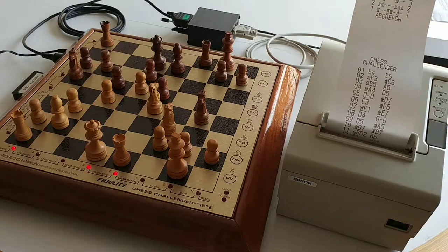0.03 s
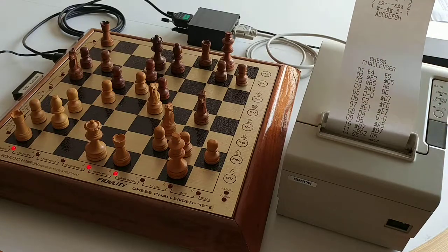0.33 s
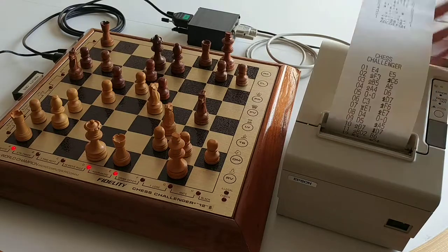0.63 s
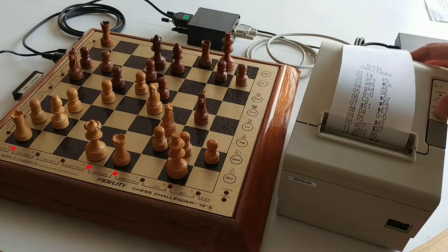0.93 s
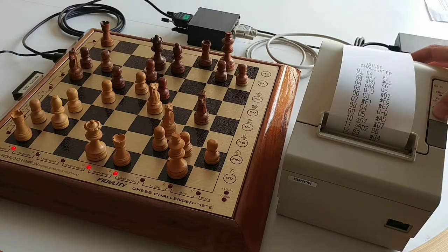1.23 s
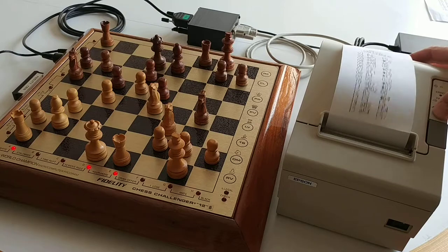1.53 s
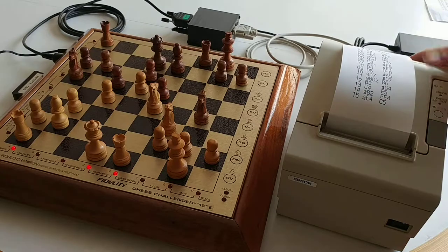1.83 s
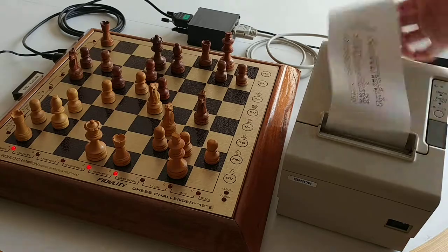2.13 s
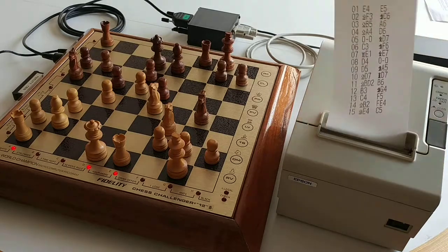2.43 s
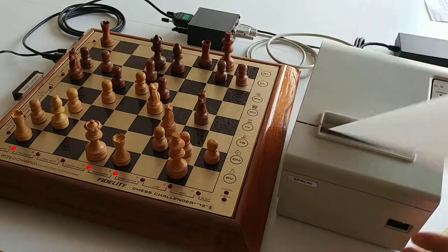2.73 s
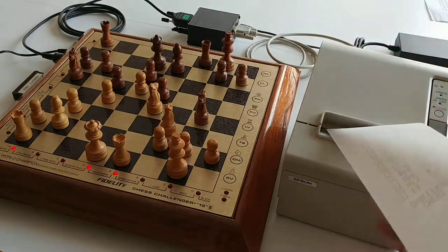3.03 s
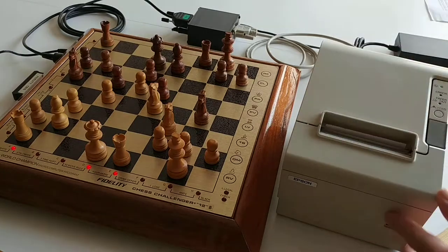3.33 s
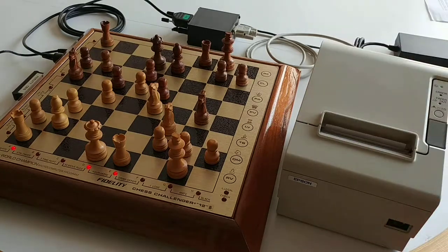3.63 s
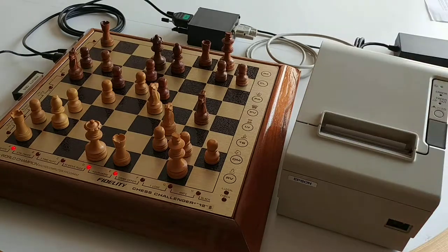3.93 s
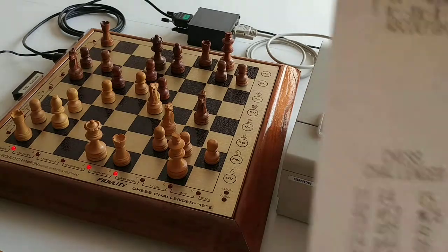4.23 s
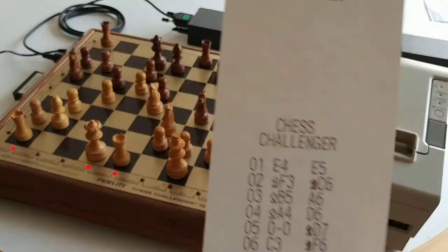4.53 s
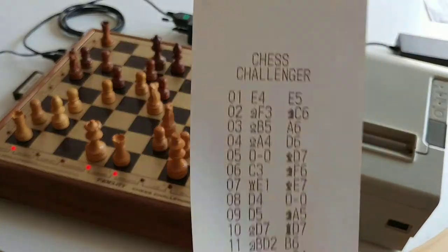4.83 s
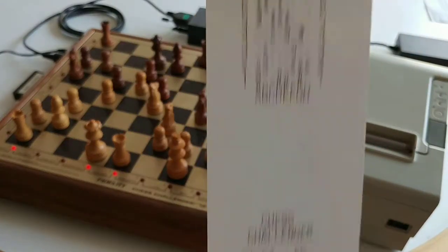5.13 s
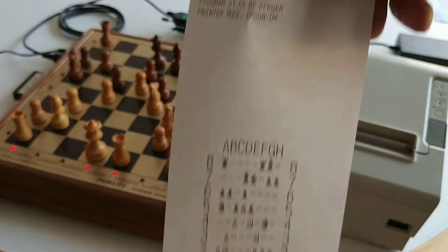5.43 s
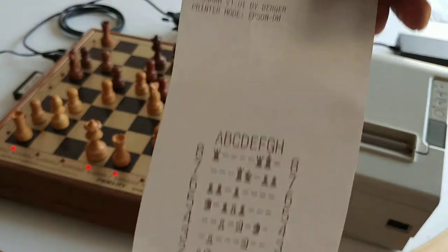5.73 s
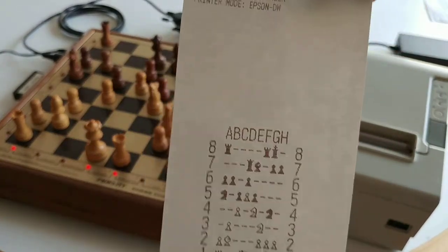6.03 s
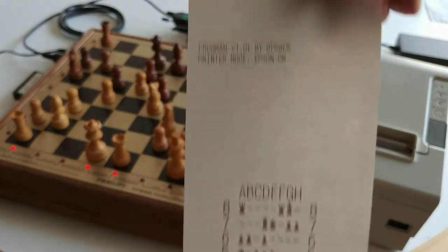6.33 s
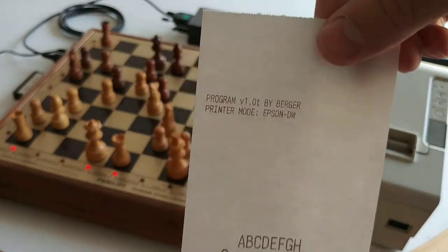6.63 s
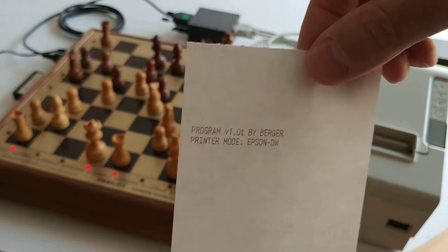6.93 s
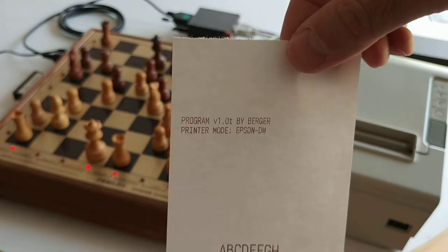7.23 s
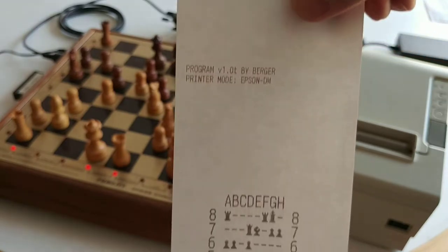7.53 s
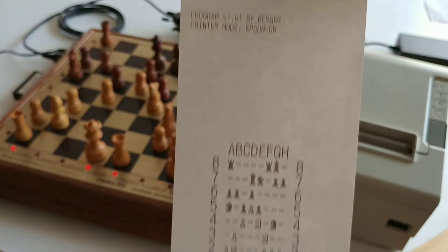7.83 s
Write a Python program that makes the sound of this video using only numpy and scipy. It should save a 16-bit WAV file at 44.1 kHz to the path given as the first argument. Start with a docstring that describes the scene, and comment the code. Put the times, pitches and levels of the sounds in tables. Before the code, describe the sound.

A small, quiet room with a faint low background murmur. After a slight paper rustle, a receipt printer a little to the right clicks at about 1 second and gives a tiny motor nudge. From 1.4 to 1.7 seconds it feeds paper with a short whine over rasping gears, its case shuddering and ringing faintly. From 2 seconds the paper hisses softly as it is pulled taut, then nicks with a sharp snap at 2.7. At about 3.2 seconds comes one short, loud rip, followed by a dull flap and light rustling. From 4.2 to 5.5 seconds the strip swings up close to the microphone, with crisp snaps, sliding hiss and soft, low puffs of air. Lighter crinkles and pops follow, close and centred, until about 6.5 seconds, then only faint paper rustles remain, fading toward 8 seconds.

```python
"""A small receipt printer clicks, nudges its paper, then feeds it: the stepper motor clatters up into
a whine, gears rasp, the frame rings and the case shudders. A hand pulls the strip taut and rips it off
along the toothed bar, fibres breaking in spurts. Swung up close to the microphones, the strip slides
with a hiss, buckles, snaps and pushes soft puffs of air. The room is small and quiet."""
import sys
import numpy as np
from scipy import signal
from scipy.fft import rfft, irfft, next_fast_len
from scipy.io import wavfile
from scipy.ndimage import map_coordinates

SR = 44100
rng = np.random.default_rng(int(sys.argv[2]) if len(sys.argv) > 2 else 0)


def dump_mix(stems):
    """Bounce the given channels to the path in sys.argv[1] as a 16-bit WAV at rate SR."""
    frames = np.atleast_2d(stems).T  # one column per channel
    limited = np.clip(frames, -1, 1)  # hard clip at full scale
    pcm = np.round(limited * 32767).astype(np.int16)
    wavfile.write(sys.argv[1], SR, pcm)


N = 357210
T = np.arange(N) / SR
SIDE = np.array([[1], [-1]])  # adds on the left, subtracts on the right


def amp(db):
    """Decibels to gain."""
    return 10 ** (np.asarray(db) / 20)


def unit(x):
    """Scale to rms 1."""
    return x / np.sqrt(np.mean(x ** 2) + 1e-20)


def along(points, hz):
    """Read a curve of (freq_hz, value) points on a log frequency axis."""
    freqs, values = np.transpose(points)
    return np.interp(np.log(hz + 1), np.log(freqs + 1), values)


def wobble(rate):
    """A smooth random curve, rate knots a second."""
    return map_coordinates(rng.standard_normal(int(N * rate / SR) + 4), [T * rate])


def swell_db(start, end, rise, t60, t=T):
    """Envelope in dB: attack (20 dB in rise seconds), hold from start to end, release."""
    return 20 * np.minimum(t - start, 0) / rise - 60 * np.maximum(t - end, 0) / t60


def colour(x, points, tilt_db=0):
    """Minimum-phase EQ through (freq_hz, gain_db) points, tilted per octave; white noise keeps its power."""
    n = x.shape[-1]
    m = 2 * next_fast_len(n // 2 + 4096)
    hz = np.fft.rfftfreq(m, 1 / SR)
    gain = unit(amp(along(points, hz) + tilt_db * np.log2(hz + 20)))
    cepstrum = irfft(np.log(gain + 1e-6))
    cepstrum[1:m // 2] *= 2
    cepstrum[m // 2 + 1:] = 0
    return irfft(rfft(x, m) * np.exp(rfft(cepstrum)), m)[..., :n]


def noise(points):
    """Coloured noise of rms about 1."""
    return colour(rng.standard_normal(N), points)


def crackle(rate, spread_db, size=N):
    """Tiny impulses of uneven strength at random times, rms 1."""
    strength = amp(spread_db * np.clip(rng.standard_normal(size), -2, 2)) * rng.standard_normal(size)
    return unit(strength * (rng.random(size) < rate / SR))


def add(track, start_s, sound):
    """Mix a sound into the track at start_s."""
    part = track[max(round(start_s * SR), 0):][:len(sound)]
    part += sound[:len(part)]


def broad(source, apart_hz):
    """A wide sheet: above apart_hz each microphone hears a different part of it."""
    mid, side = rfft(np.array([source(), source()]))
    hz = np.fft.rfftfreq(N, 1 / SR)
    width = np.pi / 4 * hz ** 2 / (hz ** 2 + apart_hz ** 2)
    return irfft(np.cos(width) * mid + SIDE * np.sin(width) * side, N)


# The small room's reverb time: freq_hz, t60_s
ROOM_DECAY = [(100, .7), (350, .55), (800, .42), (2000, .35), (8000, .32), (15000, .28)]


def place(x, lag_ms, wet_db):
    """Direct sound, reaching the left microphone lag_ms after the right, plus the room's reverb."""
    m = next_fast_len(N + SR)
    hz = np.fft.rfftfreq(m, 1 / SR)
    direct = np.exp(-1j * np.pi * hz * lag_ms / 1000 * SIDE)
    bands_hz, t, wash = signal.stft(rng.standard_normal((2, SR * 3 // 4)), SR, nperseg=256)
    decay = amp(-60 * t / along(ROOM_DECAY, bands_hz)[:, None]) * (t > .003)
    tail = signal.istft(wash * decay, SR, nperseg=256)[1]
    mid, side = rfft(tail / np.linalg.norm(tail[0]), m)
    width = np.pi / 4 * hz / (hz + 900)  # long waves reach both microphones alike
    reverb = np.cos(width) * mid + SIDE * np.sin(width) * side
    return irfft(rfft(x, m) * (direct + amp(wet_db) * reverb), m)[:, :N]


# Colour of the left and right microphone ports: freq_hz, gain_db
LEFT_PORT_EQ = [(200, 4.5), (380, 3.5), (700, 5), (2400, 4.5), (4500, 5), (7000, 2), (8100, 0.5),
                (8800, -3.5), (10400, 6.5), (12500, -1), (15500, -2)]
RIGHT_PORT_EQ = [(200, 6.5), (380, 8.5), (700, 3), (2400, 7), (4500, 7.5), (6000, 8.5), (7300, 13.5),
                 (8200, 6.5), (9000, -14), (10200, -1.5), (12500, -3), (15500, -14.5)]


def mic_ports(x):
    """Each microphone port has its own resonances."""
    return np.array([colour(x[0], LEFT_PORT_EQ), colour(x[1], RIGHT_PORT_EQ)])


# Colour of the still room: freq_hz, gain_db
ROOM_TONE_EQ = [(22, -24.5), (38, -6), (54, 0), (100, -4), (150, -12.5), (270, -9.5), (400, -17),
                (580, -9.5), (1000, -21), (1700, -28), (5000, -34), (8800, -37), (10400, -29.5),
                (15000, -43.5)]


def room_tone(floor_db=-69.5, side_db=-8):
    """A bed of low murmur and faint hiss."""
    return amp(floor_db) * (noise(ROOM_TONE_EQ) + amp(side_db) * SIDE * noise(ROOM_TONE_EQ))


SWING_START_S, SWING_END_S, SWING_RISE_S = 4.12, 4.36, 1.0  # the strip is swung up to the microphones
# Low rumble of air pushed by the strip: freq_hz, gain_db
AIR_EQ = [(15, -37), (30, -12), (48, 9.5), (110, -11), (250, -9), (1000, -68.5)]


def waft(swing_db=-58, puff_db=-16, side_db=-7):
    """The swing and each flap after it push a little air at the microphones, not quite alike at both."""
    swing = swing_db + swell_db(SWING_START_S, SWING_END_S, SWING_RISE_S, t60=0.77)
    puffs = [db + puff_db + swell_db(peak_s, peak_s, rise=0.023, t60=0.19)
             for peak_s, db, _, _ in DULL_BURSTS if peak_s > SWING_END_S]
    air = noise(AIR_EQ) + amp(side_db) * SIDE * noise(AIR_EQ)
    return amp(np.max([swing] + puffs, axis=0)) * air


# Body of the loose sheet, shared by bends, bursts and pops: freq_hz, gain_db
SHEET_EQ = [(25, -25.5), (50, -10.5), (150, -7), (350, -8), (600, 5), (900, -0.5), (1400, -5.5), (2500, -9),
            (5000, -15.5), (8000, -15), (15000, -32.5)]


def bend(level_db=-68, fidget_db=3, settle_db_per_s=10):
    """Held up, the strip murmurs as it bends and slowly calms down."""
    held_db = swell_db(SWING_START_S, SWING_END_S, SWING_RISE_S, t60=60 / settle_db_per_s)
    return amp(held_db + level_db + fidget_db * wobble(10)) * colour(crackle(4000, 2), SHEET_EQ)


# Colour of the paper hiss: freq_hz, gain_db
HISS_EQ = [(200, -7), (700, -1), (1500, -9), (3500, -6), (7000, 0.5), (11000, -3.5), (15000, -13)]
# Swells of hiss: start_s, end_s, level_db, ramp_db, rise_s
HISS_SWELLS = [(0.557, 0.637, -73, 8, 0.12), (0.903, 0.946, -61, -5, 0.026),
               (2.054, 2.265, -57.5, -4, 0.095), (2.37, 2.612, -49, 9, 0.21),
               (2.705, 2.74, -45.5, -20, 0.016), (2.992, 3.016, -54.5, 0.5, 0.077),
               (3.11, 3.133, -54.5, 20, .04), (3.607, 3.686, -53.5, 5.5, 0.14),
               (3.93, 3.96, -65, -1.5, .015), (4.121, 4.24, -56.5, -5, 0.079),
               (4.253, 4.35, -45.5, -5, 0.031), (4.408, 4.493, -43, 8.5, .05),
               (4.575, 4.64, -44, -0.5, .08), (4.856, 4.9, -54, 2, 0.23), (5.103, 5.151, -37.5, 2.5, 0.13),
               (5.333, 5.382, -45.5, 2, 0.04), (5.736, 5.879, -51, 5.5, 0.014), (5.96, 6.15, -56, 2, 0.059),
               (6.492, 6.629, -62.5, -6, .015), (6.761, 6.83, -69, 0, 0.073),
               (7.453, 7.508, -66.5, -1, .08), (7.859, 8.089, -63, -4, .06)]


def paper_hiss(trim_db=-3, crinkle_db=-8, uneven_db=1.96, t60_s=0.39):
    """Fine hiss with stray crinkles: paper sliding, and the fading wash after a loud snap."""
    t = np.arange(0, N / SR, .002)
    swells = []
    for start, end, db, ramp_db, rise in HISS_SWELLS:
        ramp = np.clip((t - start) / (end - start) - .5, -.5, .5)
        swells.append(db + ramp_db * ramp + swell_db(start, end, rise, t60_s, t))
    envelope_db = np.interp(T, t, np.max(swells, axis=0))
    grains = crackle(20000, 2) + amp(crinkle_db) * crackle(300, 3)
    return amp(envelope_db + trim_db + uneven_db * wobble(40)) * colour(grains, HISS_EQ)


# Short dull bursts: peak_s, level_db, rise_s, tilt_db_per_octave
DULL_BURSTS = [(.954, -52.5, 0.1, -0.5), (1.052, -41.5, 0.0027, 0), (2.188, -50, 0.005, 3),
               (2.211, -42.5, 0.027, 3), (2.69, -25.5, 0.015, 3), (2.866, -47, 0.0058, -2),
               (3.33, -32, 0.025, -2), (3.42, -45.5, .007, -0.5), (3.835, -51.5, .04, -2.5),
               (3.984, -51.5, .005, -3.5), (4.115, -47.5, 0.034, -4.5), (4.32, -45, 0.067, -2.5),
               (4.385, -33, 0.012, 0), (4.458, -39.5, 0.048, -1), (4.611, -43.5, .014, -3),
               (4.988, -52.5, .011, 0.5), (5.089, -38.5, 0.018, 3.5), (5.16, -37, 0.066, 0.5),
               (5.226, -43.5, .02, 0.5), (5.438, -37, 0.035, -.5), (5.616, -46, 0.015, -3),
               (5.73, -49, 0.006, 2), (5.888, -50.5, 0.0095, -4.5), (5.962, -39.5, 0.042, -1.5),
               (6.107, -47.5, 0.0094, -3.5), (6.197, -56.5, .005, -2.5), (6.342, -60, .01, 0),
               (6.435, -51, .003, -3), (6.492, -50, .0045, -4), (6.832, -58.5, .003, -3.5),
               (7.1, -67, 0.0037, -6), (7.5, -62.5, 0.13, 0), (7.601, -62.5, .005, -5),
               (7.659, -60.5, .007, -5), (7.78, -62, .005, -4)]


def dull_bursts(grains_per_s=7000, spread_db=4, t60_s=.11):
    """Crackle swells and dies away: the sheet's flaps, the printer click's tail, the first nick's body."""
    track, lead_s = np.zeros(N), (SR // 8) / SR
    t = T[:SR // 3] - lead_s
    for peak_s, db, rise, tilt_db in DULL_BURSTS:
        grains = amp(swell_db(0, 0, rise, t60_s, t)) * crackle(grains_per_s, spread_db, size=len(t))
        add(track, peak_s - lead_s, amp(db) * colour(grains, SHEET_EQ, tilt_db))
    return track


# Colour of a crack around its pitch: pitch_ratio, gain_db
CRACK_EQ = [(.1, -22), (.4, -12), (.7, -2), (1, 0), (1.7, -3), (3, -14), (8, -28)]
# Paper snaps and printer clicks: start_s, level_db, pitch_hz, pop_db (against the crack)
SNAPS = [(0.625, -51.5, 5960, -8), (.83, -62, 2300, -9), (1.048, -35.5, 1790, 4), (2.7333, -22, 5600, -9),
         (2.8625, -35, 6100, -15), (3.13, -25, 7340, -4), (3.921, -48.5, 5100, -7.5),
         (4.087, -52, 3530, 13), (4.1153, -46.5, 3090, 17), (4.254, -22, 3600, -16),
         (4.379, -23.5, 3340, -3), (5.0843, -33, 3550, -3), (5.144, -33, 3020, -5),
         (5.3339, -22.5, 8100, -22), (5.727, -46, 3000, -1.5), (5.961, -35.5, 2150, -17),
         (6.101, -40.5, 2870, -5), (6.4862, -42, 1748, 9)]


def snaps(pop_t60_s=0.0089, crack_t60_s=0.015, shiver=0.74):
    """Each snap is a sudden flick and a brief shiver, with a duller pop of the surface around it."""
    track, t = np.zeros(N), T[:SR // 16]
    for start_s, db, pitch_hz, pop_db in SNAPS:
        flick = shiver * rng.standard_normal(len(t)) * amp(-60 * t / crack_t60_s)
        flick[0] = 2  # the opening spike
        crack = colour(flick, np.array(CRACK_EQ) * [pitch_hz, 1])
        pop = colour(rng.standard_normal(len(t)) * amp(-60 * t / pop_t60_s), SHEET_EQ)
        snap = unit(crack) + amp(pop_db) * unit(pop)
        add(track, start_s, amp(db) * snap / snap[:SR // 500].std())  # the first 2 ms set the level
    return track


# Colour of the taut sheet: freq_hz, gain_db
TAUT_SHEET_EQ = [(28, -28.5), (60, -13.5), (250, -17.5), (400, 1), (620, 1.5), (840, 8.5), (1150, -3.5),
                 (1600, -4.5), (2400, 0), (3300, -3), (5500, 0.5), (7200, 1.5), (10000, 1), (15000, -2.5)]
# A first nick, then the full rip: start_s, end_s, level_db, tilt_db_per_octave
TEARS = [(2.691, 2.719, -30, -0.97), (3.15, 3.259, -9, 0.5)]


def rip(teeth_per_s=500, tooth_db=2, snag_db=1.55, build_db=7.5, build_s=0.022):
    """Fibres break by the thousand, in spurts on the bar's teeth, louder as the pull builds."""
    breaks = unit(crackle(22000, 0.97) * amp(tooth_db * wobble(teeth_per_s) + snag_db * wobble(70)))
    track = np.zeros(N)
    for start, end, db, tilt_db in TEARS:
        pull_db = build_db * np.clip((T - start) / build_s - 1, -1, 0)
        gate_db = swell_db(start, end, rise=.002, t60=0.0041)
        track += amp(db + pull_db + gate_db) * colour(breaks, TAUT_SHEET_EQ, tilt_db)
    return track


# Low body of the printer's case: freq_hz, gain_db
CASE_EQ = [(60, -27), (100, -7), (128, -2.5), (180, -11.5), (260, -12), (400, -17), (900, -53.5)]


def case(shudder_db=-33, jolt_delay_s=0.03, hum_hz=62.5, hum_db=-59.5, octave_db=-17):
    """The case shudders after each start and stop of the motor; a low hum swells and dies away."""
    phase = 2 * np.pi * np.cumsum(hum_hz * (1 + .01 * wobble(4))) / SR
    hum_gain = amp(hum_db + swell_db(start=1.7, end=2.5, rise=1.8, t60=2.2) + wobble(6.7))
    hum = hum_gain * np.sqrt(2) * (np.sin(phase) + amp(octave_db) * np.sin(2 * phase))
    jolts = [s + jolt_delay_s for start, end, _, _ in FEED_MOVES for s in (start, end)]
    jolt_db = np.max([swell_db(s, s, rise=.012, t60=0.26) for s in jolts], axis=0)
    return amp(shudder_db + jolt_db) * noise(CASE_EQ) + hum


# Modes of the metal frame: pitch_hz, level_db, t60_s
FRAME_MODES = [(2164, -38.5, 0.35), (1750, -53.5, 0.29), (418.6, -44.5, 0.17)]


def frame_ring(force):
    """The running motor excites the frame, which rings on after it stops."""
    track = np.zeros(N)
    for hz, db, t60 in FRAME_MODES:
        decay = amp(-60 * T[:SR // 2] / t60)
        envelope = signal.fftconvolve(force, decay / decay.sum())[:N]
        track += amp(db + 3 * wobble(35)) * envelope * np.sin(2 * np.pi * hz * T + 0.98 * wobble(30))
    return track


# The paper feed, a nudge and a run: at_speed_s, brake_s, speed_ratio (1 is full speed), drive_db
FEED_MOVES = [(1.148, 1.156, .44, -2.5), (1.437, 1.69, 1, -1)]


def feed(ramp_per_s=90, grip_speed=0.39, stop_speed=.095, slack_db=8, brake_db_per_s=177):
    """Motor speed and drive: the step period shrinks steadily to its shortest, holds, and grows again."""
    speed, drive = np.zeros(N), np.zeros(N)
    for start, end, top_speed, db in FEED_MOVES:
        braking_s = np.maximum(T - end, 0)
        period = 1 / top_speed + ramp_per_s * (np.maximum(start - T, 0) + braking_s)
        slack = np.maximum(period - 1 / grip_speed, 0) * (T < start)  # softer until the gears take hold
        drive += amp(db - slack_db * slack - brake_db_per_s * braking_s) * (period < 1 / stop_speed)
        speed = np.maximum(speed, 1 / period)
    return np.minimum(speed, 1), drive


# Colours of the motor mount and of the gear rasp: freq_hz, gain_db
MOUNT_EQ = [(60, -27), (130, -7.5), (250, -10.5), (420, 0), (530, 1), (620, 6.5), (740, -4), (880, -1.5),
            (1100, -22), (2200, -22.5), (4000, -36.5)]
GEAR_EQ = [(100, -28), (350, -16.5), (750, -5), (1100, -17.5), (1400, -6), (1620, 2), (1900, -5),
           (2300, -7.5), (2650, -20.5), (2950, -21), (7000, -19.5), (15000, -33.5)]
# Motor and gear tones at full speed: pitch_hz, level_db
WHINE_TONES = [(419.9, -38), (629.8, -51), (748.3, -62.5), (839.8, -43.5), (1260, -39), (1443, -49.5),
               (1480, -46.5), (1685, -28.5), (1744, -45.5), (2164, -38), (2315, -63.5), (2584, -43.5)]


def motor(step_hz=1683, flutter=0.001, rough_db=3.0, whine_db=-0.5, clatter_db=-29, play_db=2,
          gears_db=-29, mesh_depth=0.25):
    """Slow steps clatter in the mount; at speed they merge into a whine over rasping gears."""
    speed, drive = feed()
    travel = np.cumsum(speed * (1 + flutter * wobble(90))) / SR  # seconds of running at full speed
    steps = np.diff(np.floor(travel * step_hz), prepend=0) * np.sqrt(SR / (step_hz * speed))
    gear_play = amp(play_db * rng.standard_normal(N)) * (1.49 + rng.standard_normal(N)) / 2
    clatter = amp(clatter_db) * np.sqrt(1 - speed) * colour(steps * gear_play, MOUNT_EQ)
    tones = sum(amp(db + rough_db * wobble(70)) * np.sin(2 * np.pi * hz * travel)
                for hz, db in WHINE_TONES)
    whine = amp(whine_db) * np.sqrt(2) * speed ** 4 * tones
    mesh = 1 + mesh_depth * np.cos(np.pi / 2 * step_hz * travel)  # one pulse every four steps
    teeth = unit(rng.standard_normal(N) * mesh * amp(1.2 * wobble(80)))
    rasp = amp(gears_db) * speed * colour(teeth, GEAR_EQ)
    return drive * (clatter + whine + rasp) + frame_ring(drive * speed ** 2)


# The strip's pan, raising the right side and lowering the left: time_s, right_db
STRIP_PAN = [(0.5, 0.7), (2.4, 0.5), (3.7, 3), (4.5, 1), (5.1, 0.5), (5.8, -0.45), (8, -1.2)]


def scene():
    """The printer stands to the right; the torn strip travels past the right port to the close middle."""
    paper = snaps() + bend() + broad(lambda: dull_bursts() + paper_hiss(), apart_hz=3500)
    nearness = np.interp(T, [4.3, 5.3], [0, 1])
    printer = place(motor() + case(), lag_ms=0.077, wet_db=-12.5)
    tearing = place(broad(rip, apart_hz=6000), lag_ms=0.13, wet_db=-6.0)
    far_strip = place(paper * (1 - nearness), lag_ms=0.067, wet_db=-7.5)
    near_strip = place(paper * nearness, lag_ms=-0.063, wet_db=-10)
    right_db = np.interp(T, *np.transpose(STRIP_PAN))
    strip = amp(-SIDE * right_db) * (far_strip + near_strip)
    return mic_ports(printer + tearing + strip + waft()) * amp(-1.5) + room_tone()


def record(dry):
    """A soft clip rounds off peaks near full scale, and a steep low-pass trims the very top."""
    ceiling, top_hz, slope_width_hz = .95, 15800, 400
    m = next_fast_len(N + SR // 2)
    rounded = dry / (1 + np.abs(dry / ceiling) ** 6) ** (1 / 6)
    passband = np.clip((top_hz - np.fft.rfftfreq(m, 1 / SR)) / slope_width_hz + .5, 0, 1)
    return irfft(rfft(rounded, m) * np.sin(np.pi / 2 * passband) ** 2, m)[:, :N]


dry = scene()
out = record(dry)
dump_mix(out)
```